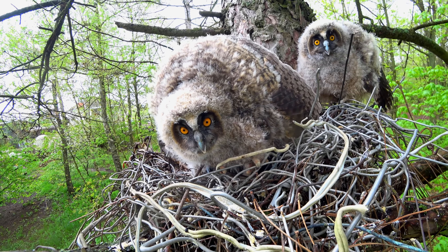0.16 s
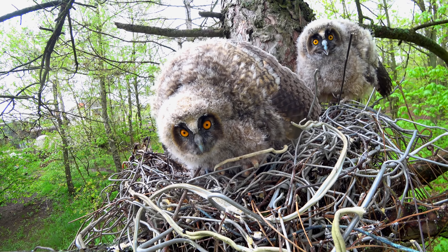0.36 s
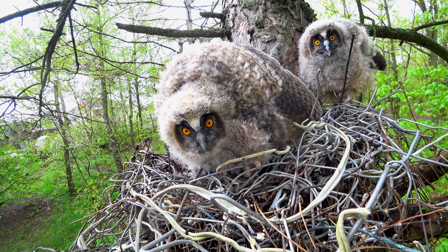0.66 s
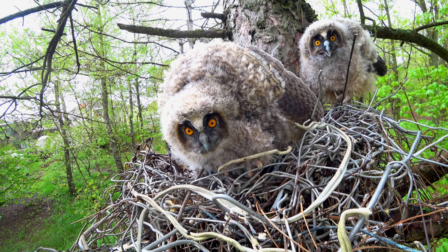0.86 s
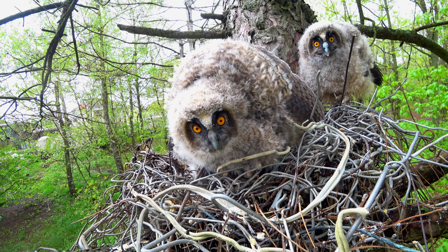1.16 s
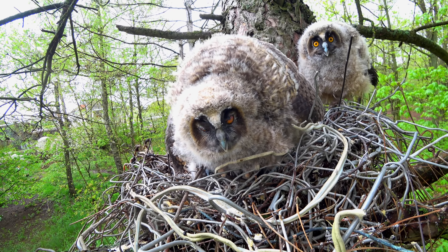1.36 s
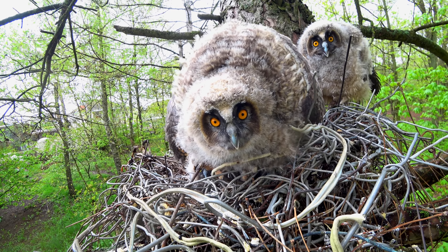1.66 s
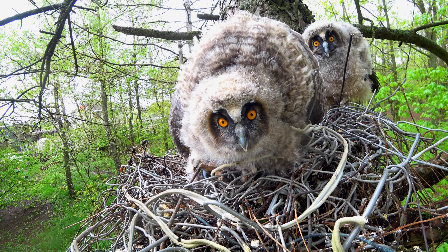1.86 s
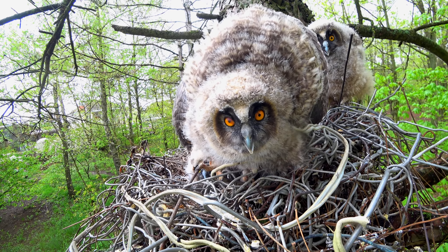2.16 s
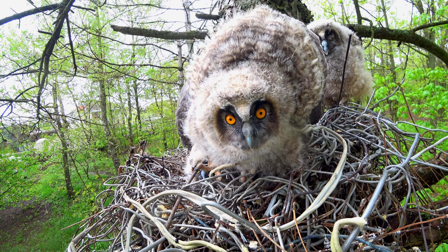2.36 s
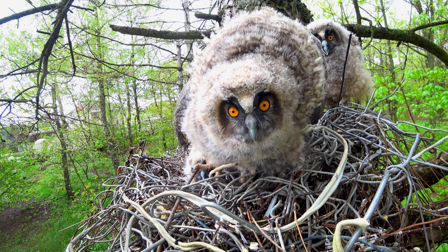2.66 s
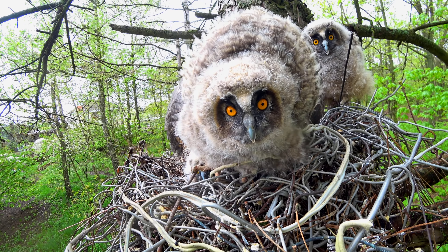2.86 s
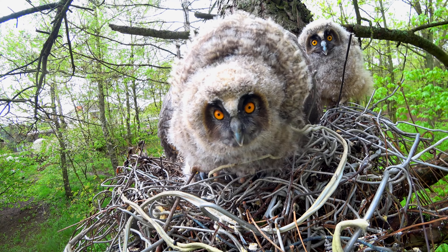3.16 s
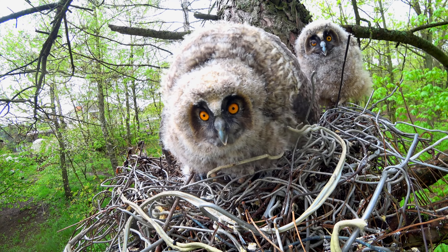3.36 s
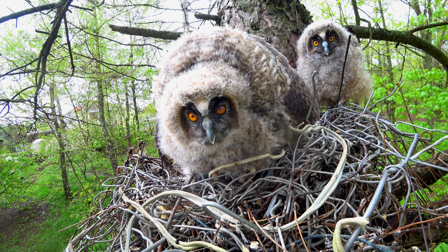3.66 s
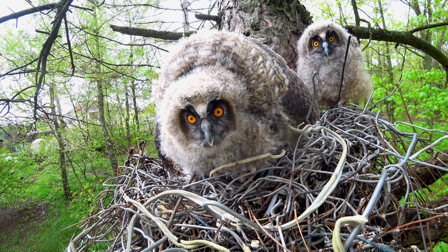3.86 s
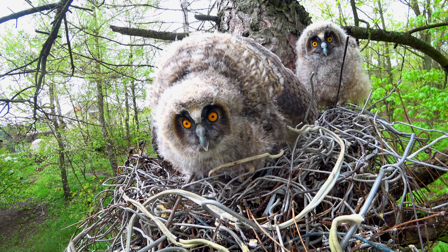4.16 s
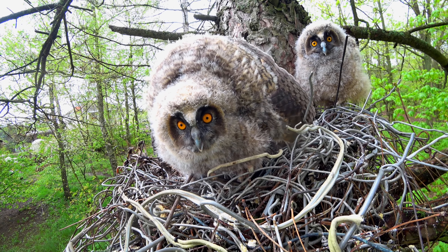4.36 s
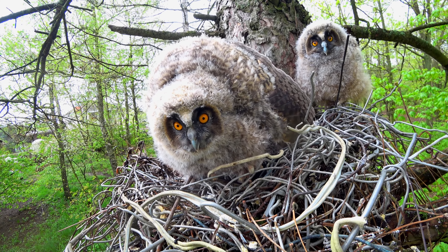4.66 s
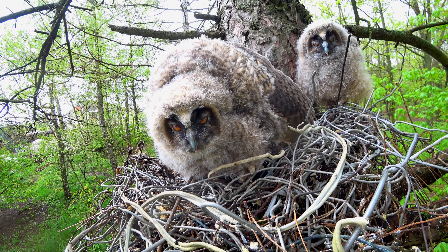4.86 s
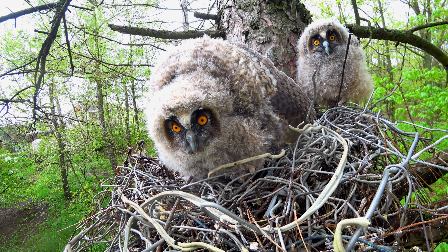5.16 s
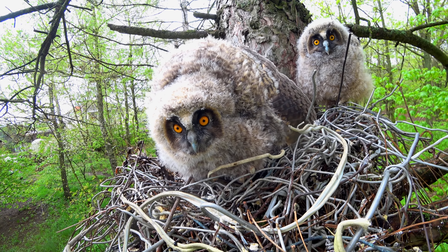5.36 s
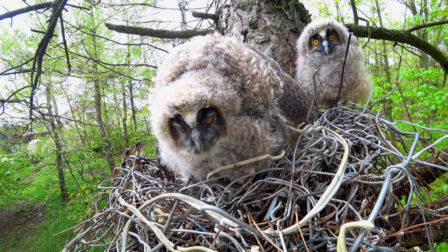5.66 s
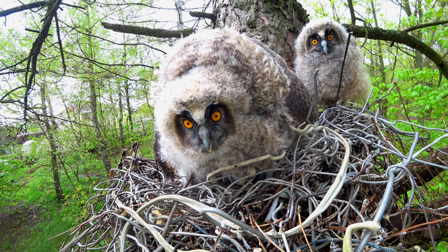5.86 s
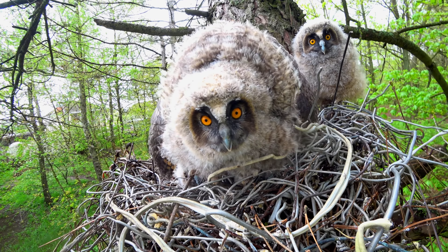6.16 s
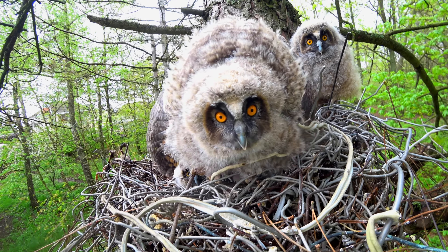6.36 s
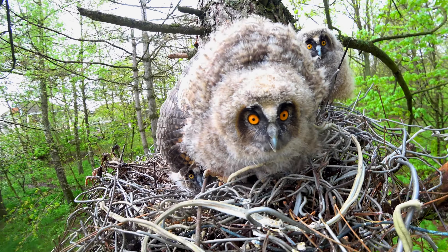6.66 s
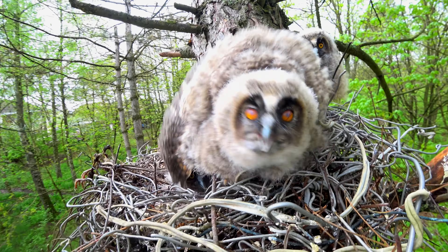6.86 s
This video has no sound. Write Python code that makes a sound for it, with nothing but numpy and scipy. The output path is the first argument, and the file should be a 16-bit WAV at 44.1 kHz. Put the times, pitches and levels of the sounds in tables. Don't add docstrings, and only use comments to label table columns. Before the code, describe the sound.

Very close to the microphone, an owl chick's hiss fades, then its bill ticks and claps. A second chick hisses more quietly behind. Hard dry snaps, each preceded by a tiny sticky tick, alternate with long rising and falling hisses. Faint songbirds, a distant trill and soft dove coos sit in a leafy woodland wash. After two late snaps, a stronger hiss lunges at the microphone with a small gust.

```python
import sys
import numpy as np
from scipy import signal
from scipy.fft import rfft, irfft, next_fast_len
from scipy.io import wavfile
from scipy.ndimage import uniform_filter1d

SR = 44100
rng = np.random.default_rng(int(sys.argv[2]) if len(sys.argv) > 2 else 0)


def unload_wav(signal):
    wavfile.write(
        sys.argv[1],
        SR,
        np.round(np.clip(np.atleast_2d(signal).T, -1, 1) * 32767).astype(np.int16),
    )


def rack_gain(trim_db):
    fader = np.asarray(trim_db, float)
    return 10 ** (fader / 20)


N = 309582

# frequency in Hz, level in dB per Hz.
TICK_TONE = [(300, -44), (750, -28), (1200, -8), (1800, -14), (2600, -10), (3400, -18), (4200, -11),
             (5000, -10), (10200, -10), (12000, -15), (14000, -11), (16500, -14)]
LUNGE_S, LUNGE_LENGTH_S = 6.93, 0.025


def evened(x):
    return x / np.sqrt(np.mean(abs(x) ** 2) + 1e-20)


def read(points, hz):
    f, value = np.transpose(points)
    return np.interp(np.log(hz + 1), np.log(f + 1), value)


def add(mix, s, sound):
    part = mix[round(s * SR):][:len(sound)]
    part += sound[:len(part)]


def causal(db, t60):
    log = np.log(rack_gain(np.maximum(np.r_[db, db[-2:0:-1]], -100)))
    ring = np.fft.ifft(np.exp(log - 1j * signal.hilbert(log).imag)).real[:len(db)]
    return ring * rack_gain(-60 * np.arange(len(db)) / SR / t60)


def wobble(size, smooth):
    once = uniform_filter1d(rng.standard_normal(size), smooth)
    return evened(uniform_filter1d(once, smooth))


def shaped(db, size):
    return evened(irfft(rfft(rng.standard_normal(size)) * rack_gain(db), size))


def low_passed(x, edge_hz):
    return signal.oaconvolve(x, signal.firwin(401, edge_hz, window=("kaiser", 9), fs=SR)[None], "same")


def note(length, hz):
    u = np.arange(0, length, 1 / SR) / length
    waver = .012 * min(1, hz[1] / 2000) * wobble(len(u), smooth=120)
    pitch = np.polyval(np.polyfit([0, .5, 1], hz, 2), u) * (1 + waver)
    depth_db = 4.5 if 3000 < hz[1] < 6000 else 2.
    flicker_db = depth_db * wobble(len(u), smooth=200) - 1
    return rack_gain(flicker_db) * np.sin(2 * np.pi * np.cumsum(pitch) / SR) * signal.windows.tukey(len(u), .5)


def hiss(row, ridges, mouth, pipe, depth, extra_db):
    # frequency in Hz, level in dB per Hz.
    throat_tone = [(150, -39.5), (250, -32), (333, -32), (433, -23), (541, -20.5), (1460, 1), (2850, -2.5),
                   (3510, -6), (4500, -5), (5700, -9), (7410, -33), (12500, -120)]
    jet_tone = [(4400, -30), (5700, 0.5), (6600, -2), (7500, 0), (8700, 2), (9500, 1.2), (10600, -2),
                (11400, -1.5), (12200, -3.5), (13600, -5), (14800, -6), (15600, -10), (17000, -30)]
    # frequency in Hz, width in Hz, level in dB.
    notches = [(1560, 1000, 2), (5840, 460, -8.5), (9900, 220, -11), (11170, 700, 3), (12900, 1200, -2.5)]
    open_s, close_s = 0.031, 0.047
    edge_db, swell_power = -51, 2.4
    start, crest, end, first_db, top_db = row
    t = np.arange(max(start, 0), min(end, N / SR), 1 / SR)

    before_crest = (crest - t) / (crest - start - open_s)
    after_crest = (t - crest) / (end - close_s - crest)
    away = np.clip(np.maximum(before_crest, after_crest), 0, 1)
    opening = np.clip(1 - (t - start) / open_s, 0, 1)
    closing = np.clip(1 - (end - t) / close_s, 0, 1)
    swell_db = (np.where(t < crest, first_db, edge_db) - top_db) * away ** swell_power
    effort_db = top_db + swell_db - 23 * (opening + closing) ** 1.47
    settling_s = np.maximum(t - LUNGE_S - LUNGE_LENGTH_S, 0)
    lunge_db = 7.5 * np.clip((t - LUNGE_S) / LUNGE_LENGTH_S, 0, 1) - 35 * settling_s
    sharp_db = 3.5 + extra_db - 3.5 * ((t - start) / (end - start)) ** 2 - 26 * closing

    hz = np.fft.rfftfreq(len(t), 1 / SR)

    def cavity_db(shift, share):
        return sum(db * (share if 9000 < f < 10500 else 1) / (1 + (2 * (hz - f * shift) / width) ** 2)
                   for f, width, db in notches)

    notch_db = cavity_db(mouth, depth)
    notch_db = notch_db + sum(db * np.exp(-(2 * (hz - f) / width) ** 2 / 2) for f, width, db in ridges)
    gaping_db = cavity_db(.95 * mouth, .7) - 1.5 * np.clip(hz / 1500 - 8, 0, 1)
    pipe_hz = np.minimum(hz, hz / pipe + np.maximum(hz - 1500, 0))
    throat_db = read(throat_tone, pipe_hz) - 80 * (hz > throat_tone[-2][0])
    throat = shaped(throat_db + notch_db, len(t))
    jet_db = read(jet_tone, np.minimum(hz, jet_tone[-2][0])) - 80 * (hz < jet_tone[1][0])
    gape = np.clip(1 - (LUNGE_S - t) / .08, 0, 1)
    jet = np.sqrt(1 - gape) * shaped(jet_db + notch_db, len(t))
    jet = jet + np.sqrt(gape) * shaped(jet_db + gaping_db, len(t))
    eddies_db = 0.78 * wobble(len(t), smooth=60) + .8 * wobble(len(t), smooth=900)
    air = rack_gain(0.93 - .5 * gape ** 4) * throat + rack_gain(sharp_db + 0.7 + 0.092 * lunge_db) * jet
    return t[0], air * rack_gain(effort_db + lunge_db + eddies_db)


def breaths():
    # start in seconds, crest in seconds, end in seconds, first effort in dB, top effort in dB.
    hiss_rows = [
        (-.2, 0.0088, 0.24, -49, -43),
        (1.652, 1.943, 2.186, -48.5, -38),
        (3.695, 4, 4.288, -51, -38.5),
        (6.693, 6.973, 7.3, -49.5, -36),
        (.525, 0.83, 1.016, -56, -46),
    ]
    # factor on the notches, factor on the low edge (a shorter windpipe hisses thinner),
    # share of the dip near 10 kHz, extra jet in dB.
    mouths = [(0.97, 0.89, 0.49, -.5), (1.02, 0.99, .75, 0.7), (1.01, 0.976, 1.1, 0.4),
              (1.027, 1.09, 1.2, 1), (1.03, 1.18, 0.4, -0.5)]
    # hiss number, frequency in Hz, width in Hz, level in dB.
    mouth_ridges = [(0, 3200, 600, 2.5), (0, 4800, 900, -1.5), (0, 8300, 600, 3.5), (0, 10600, 800, -2),
                    (0, 13600, 600, 1), (1, 5930, 800, -1.5), (1, 11000, 500, -2), (1, 13800, 1200, 1.5),
                    (2, 13600, 900, 2), (3, 3100, 500, 2), (3, 13800, 2200, 3), (3, 5200, 900, 2),
                    (3, 9100, 500, 3), (4, 2300, 700, -2), (4, 3800, 600, 1.5), (4, 5740, 1600, 1.5),
                    (4, 7900, 600, -2), (4, 9800, 800, -2), (4, 11500, 600, -3), (4, 13700, 1400, 1.5)]
    # start in seconds, length in seconds, start Hz, middle Hz, end Hz, level in dB.
    squeak = (.522, .026, 6900, 8150, 8750, -50)
    breath = np.zeros(N)
    for k, (row, mouth) in enumerate(zip(hiss_rows, mouths)):
        own_ridges = [ridge[1:] for ridge in mouth_ridges if ridge[0] == k]
        add(breath, *hiss(row, own_ridges, *mouth))
    whistle = note(squeak[1], squeak[2:5])
    add(breath, squeak[0], rack_gain(squeak[-1]) * whistle * np.linspace(.4, 1.3, len(whistle)))
    return breath


def snaps():
    # clap in seconds, tips meet earlier by ms, thump of the trapped air in dB,
    # ring of the upper bill in dB, sharpness of the edge in dB.
    snap_rows = [(0.3853, 5.0, -2.5, 4, -1), (0.6033, 5.4, -2, 0.5, 1), (1.4895, 5.0, 8, -6, 2.5),
                 (2.36, 6.1, -9, 2, -3), (3.2803, 5.8, -7.5, 3.5, -2), (3.5668, 5.6, -3, 3.5, 0.5),
                 (4.4327, 5.8, 5.5, -1, 2.5), (6.2445, 5.7, 1.5, -0.5, -2), (6.5188, 5.6, 7, 1.5, 2.5)]
    # frequency in Hz, level in dB per Hz.
    clap_tone = [(60, -9), (300, -6.5), (560, 1), (850, 10), (1250, 17), (1900, 14), (2600, 15),
                 (3400, 9.5), (4100, 5.5), (5000, 10), (6000, 5.5), (7300, -0.2), (8500, -2.5), (9500, -5),
                 (11500, -13), (13400, -32), (14800, -12), (15500, -19.5), (16200, -37)]
    tips_tone = [(300, -38), (850, -25), (1800, -7), (2600, -3), (3400, -4), (5000, .5), (5900, -3),
                 (7000, -2), (8500, -14), (9400, -19), (11500, -17), (12500, -23), (14000, -14),
                 (16500, -21)]
    hz, t = np.fft.rfftfreq(1024, 1 / SR), np.arange(513) / SR
    front, turned = np.zeros((2, N))
    lag = np.exp(-2 * np.pi * 1800 / SR)
    seal = np.clip(1.6 - hz / 550, 0, 1) + np.clip(hz / 1500 - 8, 0, 1)
    ring = rack_gain(-10.5 - 60 * t / .0012) * np.sin(2 * np.pi * 10450 * t)
    ring = np.roll(ring, round(.00025 * SR))
    twig_db = read(TICK_TONE, hz) - 3 * np.maximum(hz / 1000 - 10, 0)
    for s, early_ms, thump_db, ring_db, sharp_db in snap_rows:
        clap_db = read(clap_tone, hz) + thump_db * seal + sharp_db * np.exp(-(hz / 2500 - 3.2) ** 2)
        clap = -causal(clap_db + .7 * wobble(len(hz), smooth=25), .01)
        clap = signal.lfilter([lag, -1], [1, -lag], clap)
        nest_echo = np.roll(uniform_filter1d(clap, size=5), round(0.00099 * SR))
        clap = clap + rack_gain(-16) * nest_echo
        rattle = signal.lfilter([.7, 0, -.7], [1, -.8], rng.standard_normal(len(t)))
        rattle = rack_gain(-34 - 60 * t / 0.005) * rattle
        twigs = rack_gain(-45 - 60 * t / 0.057) * shaped(twig_db, 1024)[:len(t)]
        twigs = twigs * np.sin(np.pi * t / t[-1]) ** 0.36
        add(front, s - .00005, rack_gain(-.8) * clap + rattle + twigs + rack_gain(ring_db - 1.5) * ring)
        add(turned, s - .00005, 0.53 * clap)
        tips = -causal(read(tips_tone, hz) + wobble(len(hz), smooth=25), .005)
        slips = np.r_[1, .17 * (rack_gain(-60 * t / .004) * rng.standard_normal(len(t)))[1:]]
        contact = signal.convolve(tips, slips / np.linalg.norm(slips))
        add(front, s - early_ms / 1000 + .00005, contact)
    return front, turned


def ticks():
    # time in seconds, strength in dB, treble tilt in dB per octave about 4 kHz.
    tick_rows = [(0.0, -5, -10), (0.3235, -0.5, 0), (.519, -37, 6), (.524, -37, 6), (0.53, -31, 4),
                 (0.5526, -0.5, -1), (1.4314, 0.5, 0), (2.2677, -20, -5), (2.2822, -20, 6),
                 (2.2999, 1, -0.5), (3.1944, -36, 0.1), (3.2234, 0, 3), (3.484, -27, 3), (3.513, 0, 1.5),
                 (6.1687, -23, 1), (6.1874, 1.5, -1.5), (6.4408, -19, -3), (6.4626, 1, 1),
                 (6.7035, -20, -3)]
    more_ticks = [(6.2205, -22, -1.5), (6.228, -21, .4), (6.2315, -27, .4)]
    hz, t = np.fft.rfftfreq(1024, 1 / SR), np.arange(513) / SR
    front = np.zeros(N)
    for s, strength_db, tilt_db in list(tick_rows) + list(more_ticks):
        tilt = tilt_db * np.clip(np.log2(hz / 4000 + .01), -1, 2)
        body = causal(read(TICK_TONE, hz) + tilt, 0.011)
        crackle = rack_gain(-60 * t / .004) * rng.standard_normal(len(t)) * np.clip(t / t[8], .2, 1)
        crackle[8] = 4
        crackle = crackle / np.linalg.norm(crackle)
        add(front, s + 0.00094, rack_gain(strength_db) * signal.convolve(body, crackle))
    return front


def puff():
    front = np.zeros(N)
    size = round(0.03 * SR)
    hz = np.fft.rfftfreq(size, 1 / SR)
    air = shaped(read(TICK_TONE, hz) - 2.7 * np.maximum(hz / 1000 - 9, 0), size)
    add(front, .388, rack_gain(-45) * air * np.sin(np.pi * np.linspace(0, 1, size) ** 0.47))
    return front


def gust():
    hz, t = np.fft.rfftfreq(N, 1 / SR), np.arange(N) / SR
    band_db = -80. * (hz > 950) - 80. * (hz < 40) + 3 * np.log2(hz / 900 + .01)
    air = signal.hilbert(shaped(band_db, N))
    rise = np.clip((t - LUNGE_S) / LUNGE_LENGTH_S, 0, 1)
    return rack_gain(-56) * rise * np.array([air.real, -air.imag])


def ports(x, side_of_x, table, turn, below_hz):
    hz = np.fft.rfftfreq(1024, 1 / SR)
    alike_db = 10 * np.log2(np.clip(hz / 700, .05, 1))
    colour = causal(read(table, hz) + alike_db, 0.009)
    side = signal.oaconvolve(side_of_x, np.r_[np.zeros(3), colour])[:N]
    size = next_fast_len(N)
    phase = turn / (1 + (np.fft.rfftfreq(size, 1 / SR) / below_hz) ** 4)
    side = irfft(rfft(side, size) * np.exp(-1j * phase), size)[:N]
    return np.array([x + side, x - side])


def whine():
    bursts = [1.385, 1.485, 2.335, 2.778, 2.878, 3.305, 4.261, 4.81, 5.125, 5.225, 5.65, 6.28]
    gate = np.zeros(N)
    for s in bursts:
        add(gate, s, signal.windows.tukey(round(0.093 * SR), .1))
    tone = np.sin(2 * np.pi * 11270 * np.arange(N) / SR)
    return rack_gain(-74 + 2.0) * gate * tone * rack_gain([[1.5], [-1.5]])


def trill():
    # time in seconds, fundamental in Hz, level in dB.
    trill_rows = [(.875, 505, -58), (.93, 610, -56), (.96, 660, -57), (1.0, 640, -57), (1.07, 665, -55),
                  (1.13, 735, -53), (1.25, 735, -54), (1.36, 733, -55), (1.47, 720, -61), (1.66, 705, -65)]
    # multiple of the fundamental, level in dB.
    orders = [(1, -25), (2, 0), (3, -13), (4, -19), (5, -22), (6, -25)]
    out = np.zeros(N)
    s, *columns = np.transpose(trill_rows)
    t = np.arange(s[0], s[-1], 1 / SR)
    hz, db = (np.interp(t, s, c) for c in columns)
    depth = .24 * np.clip((t - 1.14) / .16, .05, 1)
    beat = ((t - 1.232) * 15.8) % 1
    turns = np.cumsum(hz * (1 - depth * beat ** 1.5 + .008 * wobble(len(t), smooth=200))) / SR
    voice = sum(rack_gain(level_db) * np.sin(2 * np.pi * k * turns) for k, level_db in orders)
    gaps = 1 - np.clip(3.5 * depth, 0, 1) * beat ** 4
    add(out, s[0], rack_gain(db + 2 + 2.5 * wobble(len(t), smooth=250)) * voice * gaps)
    return out


def single_notes():
    # start in seconds, length in seconds, middle pitch in Hz, level in dB.
    held = [(.1, .31, 2500, -68), (.15, .25, 2340, -65), (.4, .2, 2790, -61.5), (.45, .13, 2630, -68),
            (.4, .15, 2400, -71), (1.245, .07, 4100, -76), (1.33, .05, 4100, -77), (1.21, .2, 3520, -79),
            (2.195, .06, 5400, -75), (2.21, .05, 4000, -74), (2.3, .03, 3700, -72), (2.68, .02, 4600, -69),
            (2.94, .1, 3600, -78), (3.1, .1, 3780, -72), (3.63, .05, 5350, -75), (4.225, .045, 912, -66),
            (4.63, .03, 4600, -73), (4.79, .03, 3600, -77), (5.49, .08, 7000, -70), (5.72, .2, 645, -82),
            (5.86, .06, 4600, -77), (5.96, .03, 440, -72), (6.055, .03, 430, -70)]
    arched = [(.24, .02, 4750, -65), (.27, .03, 4200, -70), (2.55, .06, 4130, -68), (2.74, .08, 4000, -76),
              (3.05, .022, 4950, -65), (3.118, .018, 4600, -64), (6.43, .015, 3900, -73),
              (6.3, .16, 585, -78), (6.568, .028, 4500, -66)]
    falling = [(1.255, .06, 1320, -60), (1.33, .06, 1310, -62), (5.7, .07, 7300, -72),
               (2.69, .06, 7500, -75), (2.255, .03, 4700, -70), (3.085, .015, 4700, -69),
               (4.67, .06, 3300, -77), (4.955, .04, 3700, -76), (4.975, .04, 3300, -77),
               (5.37, .06, 3300, -79), (5.6, .02, 4700, -68), (5.635, .015, 4750, -74),
               (5.67, .015, 4450, -73), (5.72, .025, 4250, -74), (5.745, .025, 3600, -72),
               (5.765, .025, 3400, -71), (5.78, .02, 2900, -73)]
    rising = [(2.315, .03, 4400, -70), (3.035, .015, 6600, -69), (6.39, .02, 5200, -69)]
    out = np.zeros(N)
    for notes, first, last in [(held, .995, .995), (arched, .87, .88), (falling, 1.07, .9), (rising, .93, 1.06)]:
        for s, length, hz, db in notes:
            add(out, s, rack_gain(db + 7.0) * note(length, [first * hz, hz, last * hz]))
    return out


def phrases():
    # delay in seconds, length in seconds, start Hz, middle Hz, end Hz.
    seep = [
        (-.02, .2, 7250, 7520, 7150),
        (.04, .17, 8350, 8150, 6400),
    ]
    coo = [
        (0, .35, 590, 668, 640),
        (.39, .2, 590, 600, 560),
    ]
    out = np.zeros(N)
    for parts, s, factor, db, second_db in [(seep, 2.575, 1.035, -73, 3), (seep, 5.58, 1, -68, 3),
                                            (coo, 2.66, 1, -69.5, -7), (coo, 4.7, 1, -70, -7)]:
        for k, (after, length, *hz) in enumerate(parts):
            add(out, s + after, rack_gain(db + k * second_db + 1.5) * note(length, factor * np.array(hz)))
    return out


def chorus():
    # from seconds, to seconds, level in dB.
    bouts = [(0, 1.5, -68), (1.5, 2.2, -75), (2.2, 3.45, -69.5), (3.45, 3.9, -75), (4.6, 4.9, -74),
             (5.5, 5.95, -75.5)]
    out = np.zeros(N)
    for when, stretch, high, bend, soft in rng.random((420, 5)):
        s = when * N / SR
        hz = (3300 + 1900 * high ** 0.68) * (1 + 0.233 * (bend - .5) * np.array([-1, .3, 1]))
        if s < 1.5 and bend < .5:
            hz = hz * .55
        level_db = max([-79.5] + [db for a, b, db in bouts if a <= s < b]) - 8 * soft
        add(out, s, rack_gain(level_db) * note(.012 + .04 * stretch ** 2, hz))
    return out


def wood(x, depth):
    # frequency in Hz, decay time t60 in seconds.
    decay = [(300, 0.15), (1500, 0.65), (2800, 1), (4500, 0.53), (12000, 0.17)]
    taps = np.zeros((2, SR // 2))
    at = np.arange(200, SR // 2 - 20, 20) + rng.integers(0, 20, (2, (SR // 2 - 201) // 20))
    np.put_along_axis(taps, at, rng.choice([-1., 1.], at.shape), 1)
    hz, t, z = signal.stft(taps, SR, nperseg=256)
    dull_db = -9 * np.log2(1 + (hz / 3500) ** 2)[:, None]
    fade_db = -60 * t / depth / read(decay, hz)[:, None]
    tail = signal.istft(z * rack_gain(dull_db + fade_db), SR, nperseg=256)[1]
    return signal.fftconvolve(x[None], tail / np.linalg.norm(tail[0]), axes=1)[:, :N]


def wash():
    # frequency in Hz, level in dB per Hz.
    wash_tone = [(18, -63), (30, -33.5), (286, -6.5), (353, -6), (459, -2), (880, -4), (1060, 2.5),
                 (1250, -4), (2270, -10.5), (3360, -11), (5250, -17), (7200, -16.5), (8870, -19.5),
                 (12800, -20.5), (15800, -24)]
    # frequency in Hz, side minus mid in dB.
    wash_side = [(60, -20), (110, -10), (200, -8), (380, -5), (700, 1.5), (1290, 6.5), (2380, 2.5),
                 (4400, 0), (8120, -2.5), (15000, -3.5)]
    # frequency in Hz, share of the side that is the mid a quarter turn late.
    wash_lead = [(300, .1), (700, .55), (1400, .5), (2200, .3), (4000, .05), (15000, .02)]
    frames, hz = N // 256 + 5, np.fft.rfftfreq(1024, 1 / SR)
    a, b, c, d, patches = rng.standard_normal((frames, 513, 5)).T
    patches = evened(uniform_filter1d(uniform_filter1d(patches, 10, 0), 14, 1))
    t = np.arange(frames) * 256 / SR
    level_db = -67 - 0.35 * t - 1.5 * np.exp(-((t - 5.26) / 0.47) ** 2)
    lead = np.clip(read(wash_lead, hz), 0, .95)[:, None]
    mid = a + 1j * b
    side = np.sqrt(1 - lead ** 2) * (c + 1j * d) - 1j * lead * mid
    z = np.array([mid, side * rack_gain(read(wash_side, hz))[:, None]]) * rack_gain(read(wash_tone, hz)[:, None])
    z = z / np.sqrt(np.mean(abs(z[0][7:21]) ** 2))
    z = z * rack_gain(1.22 * patches + level_db - 7.0)
    mid, side = signal.istft(z, nperseg=1024, noverlap=768)[1][:, :N]
    return np.array([mid + side, mid - side])


def scene():
    # frequency in Hz, side minus mid in dB.
    hiss_side = [(60, -13), (110, -15), (200, -5), (380, -19), (700, -26), (1290, -16), (2380, -22.5),
                 (4400, -35), (8120, -28), (15000, -25)]
    clap_side = [(60, 4), (110, 4.5), (200, 9.5), (380, 7), (700, -12), (1290, -13.5), (2380, -18.5),
                 (4400, -15.5), (8120, -12), (15000, -9)]
    breath = breaths()
    claps, turned = snaps()
    clicks = claps + ticks() + puff()
    birds = single_notes() + phrases() + chorus() + trill()
    far = rack_gain(-2) * birds * rack_gain([[1.2], [-1.2]]) + rack_gain(-7.5) * wood(birds, depth=1.1)
    near = ports(breath, breath * (1 + 2.0 * wobble(N, smooth=80)), hiss_side, turn=1.2, below_hz=1100)
    echo = rack_gain(-37.5) * wood(breath + clicks, depth=0.37)
    steady = near + echo + far + wash() * rack_gain([[.2], [-.2]]) + whine() + gust()
    bills = ports(clicks, 0.98 * turned + 0.47 * clicks, clap_side, turn=2.1, below_hz=550)
    return low_passed(steady, 15790) + bills


def band_limit(x):
    return signal.sosfilt(signal.butter(12, 16830, fs=SR, output="sos"), x)


def record(dry):
    return band_limit(low_passed(dry, 16520))


dry = scene()
out = record(dry)
unload_wav(out)
```